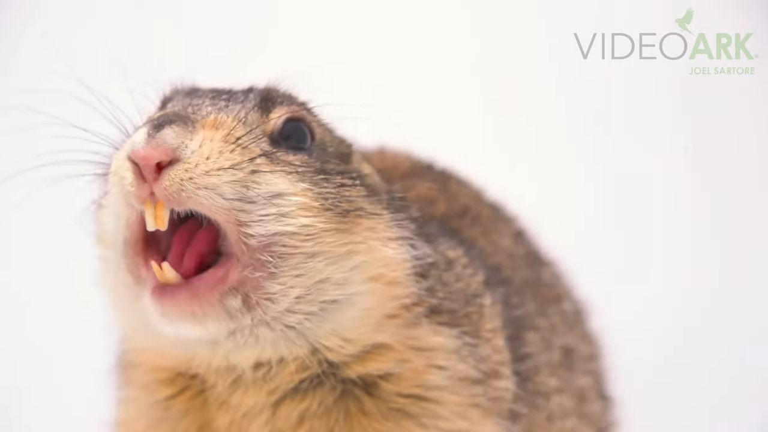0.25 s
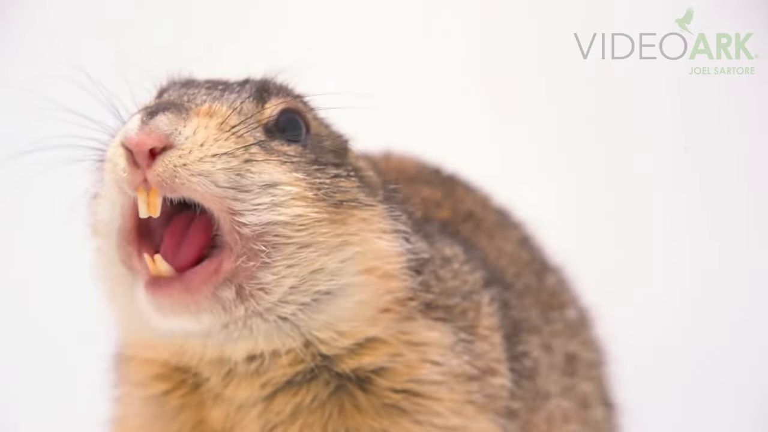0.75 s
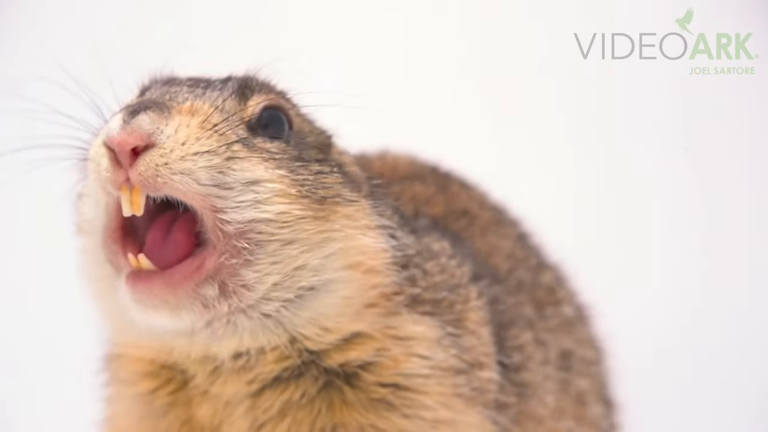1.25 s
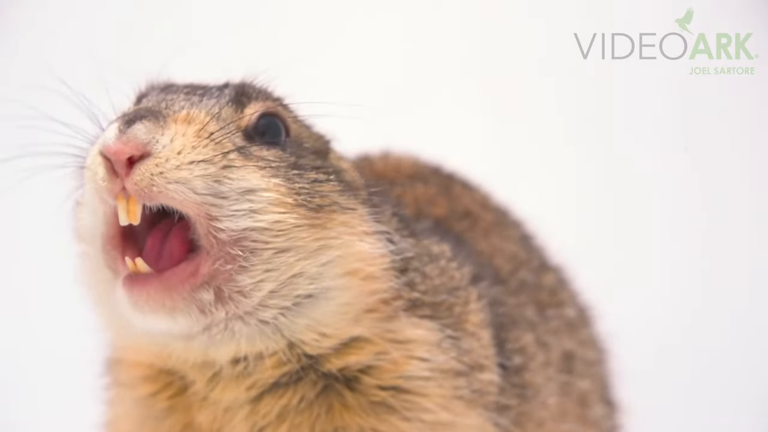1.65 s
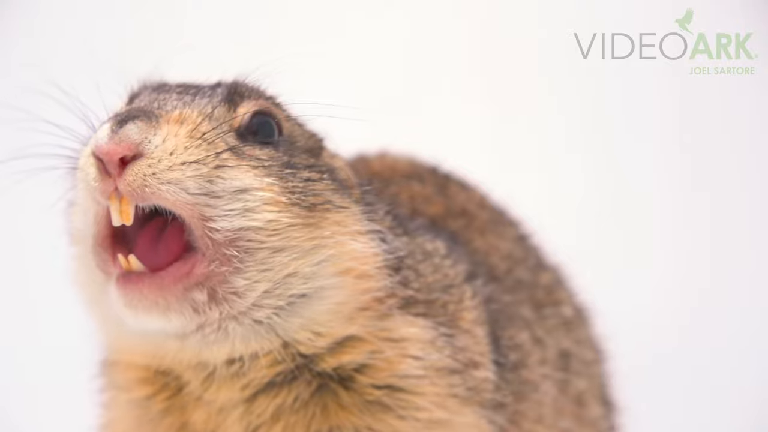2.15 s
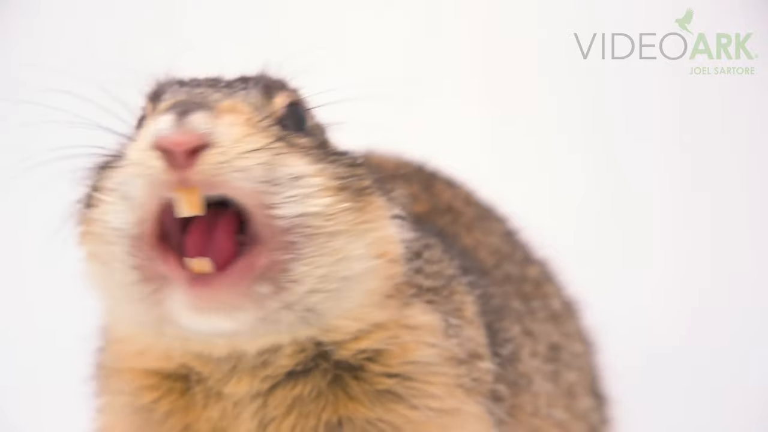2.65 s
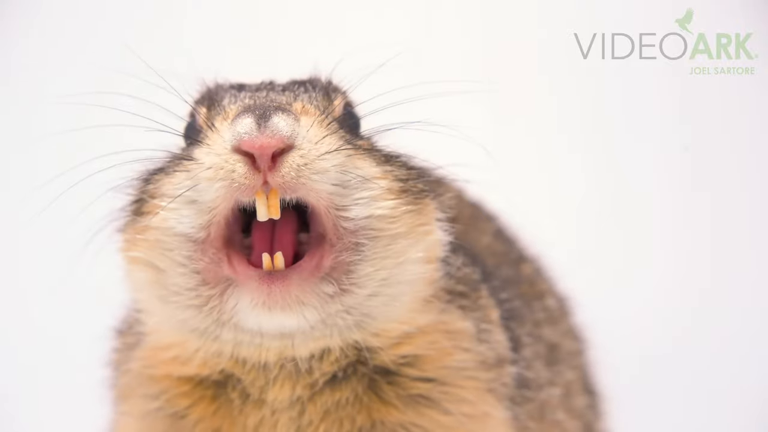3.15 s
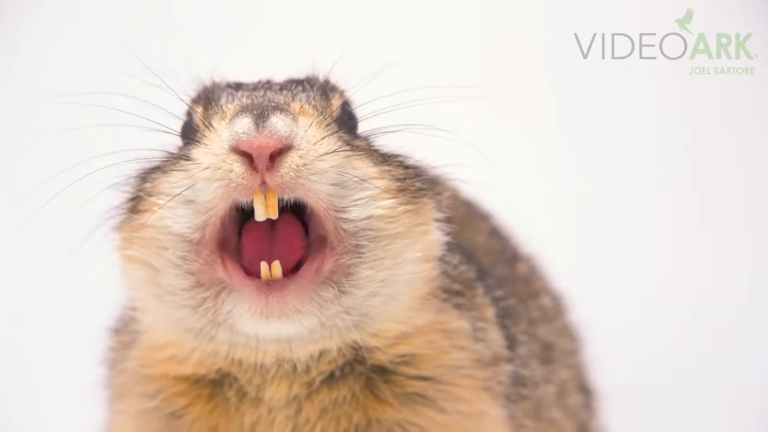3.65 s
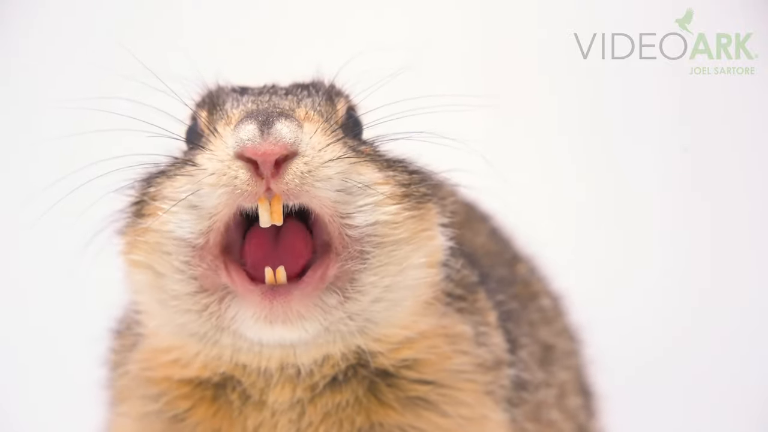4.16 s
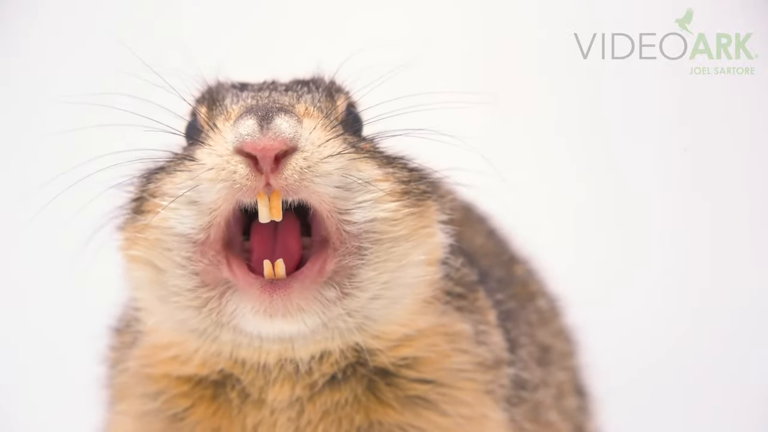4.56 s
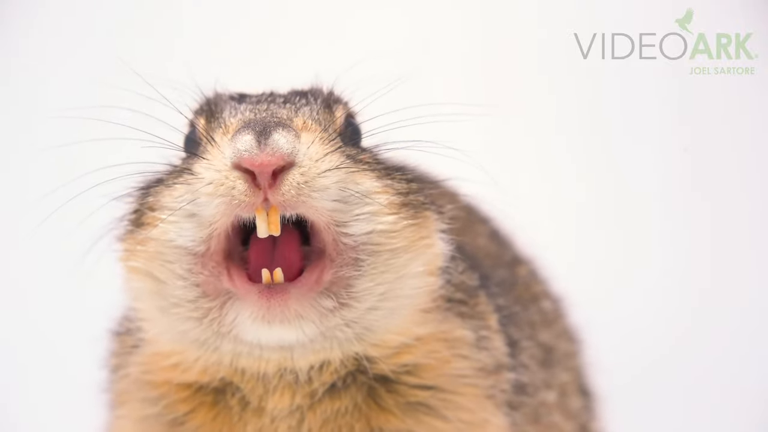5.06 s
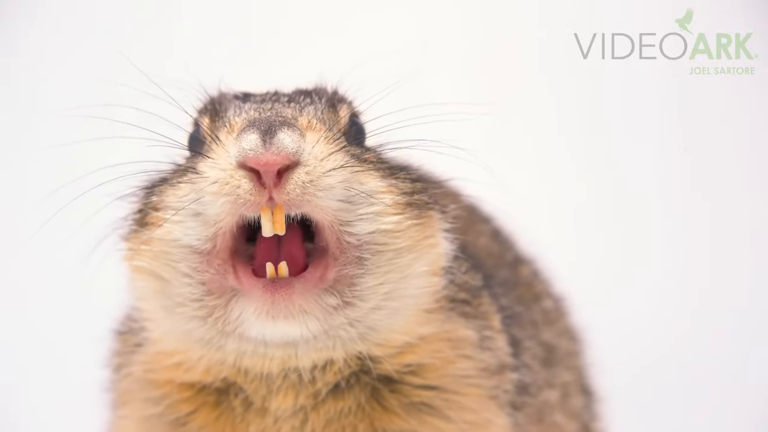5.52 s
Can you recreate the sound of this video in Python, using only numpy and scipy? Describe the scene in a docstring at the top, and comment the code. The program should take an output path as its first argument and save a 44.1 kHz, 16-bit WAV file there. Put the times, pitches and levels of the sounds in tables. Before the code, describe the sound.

A small rodent barks sharply twelve times at a steady pace, close up, with soft rattling inhales between the squeaky yelps.

```python
"""A small, dry studio: a prairie dog barks twelve times, close to a stereo microphone.
Each bark opens with a puff of noise and a few hard creaky pulses, rises into a clear arched squeal and
sags to a rough end: trains of pulses shaped by throat resonances. Between barks it draws air with a soft
rattle of fluttering noise. Its body makes low rumble and bumps, small ticks, scuffs and a short rustle."""
import sys
import numpy as np
from scipy import signal
from scipy.fft import rfft, irfft, next_fast_len
from scipy.io import wavfile
from scipy.ndimage import uniform_filter1d, map_coordinates

SR = 44100
rng = np.random.default_rng(int(sys.argv[2]) if len(sys.argv) > 2 else 0)


def waveform_to_disk(signal):
    """Save audio, clipped to [-1, 1], as 16-bit WAV at the path in sys.argv[1]."""
    frames = np.transpose(np.atleast_2d(signal))
    scaled = np.clip(frames, -1, 1) * 32767
    samples = np.round(scaled).astype(np.int16)
    wavfile.write(sys.argv[1], SR, samples)


N = 255339
TIME = np.arange(N) / SR


def from_db(db):
    """Decibels to gain."""
    return 10 ** (np.asarray(db) / 20)


def ramp(x):
    """Hold between 0 and 1."""
    return np.clip(x, 0, 1)


def rms_one(x):
    """Scale to unit power."""
    return x / np.sqrt(np.mean(x ** 2) + 1e-20)


def add(track, sound, s):
    """Mix a sound into a track from time s on."""
    at = max(round(s * SR), 0)
    track[..., at:at + sound.shape[-1]] += sound[..., :N - at]


def cut(x, hz, kind, order=2):
    """Butterworth low- or high-pass."""
    sections = signal.butter(order, min(hz, .45 * SR), kind, fs=SR, output="sos")
    return signal.sosfilt(sections, x + 1e-18)


def resonate(x, hz, width_hz, db):
    """Lift or notch one band."""
    lift = from_db(db / 2)
    half = np.pi * width_hz / SR
    turn = -2 * np.cos(2 * np.pi * hz / SR)
    zeros = [1 + half * lift, turn, 1 - half * lift]
    poles = [1 + half / lift, turn, 1 - half / lift]
    return signal.lfilter(zeros, poles, x)


def drift(rate, size=N):
    """Smooth random wander, drawn with spread 1, that changes about rate times a second."""
    points = rng.standard_normal(4000)
    return map_coordinates(points, [np.arange(size) * rate / SR], order=3, mode="wrap")


def coloured(x, spectrum):
    """Give a sound the colour of a (Hz, dB) table; nothing passes outside the table."""
    hz, db = np.transpose(spectrum)
    size = next_fast_len(N)
    grid = np.log(np.arange(size // 2 + 1) * SR / size + 1)
    gain_db = np.interp(grid, np.log(hz), db, left=-np.inf, right=-np.inf)
    return irfft(rfft(x, size) * from_db(gain_db), size)[..., :N]


def noise(spectrum, likeness):
    """Stereo noise of a given colour and left-right likeness; rms 1."""
    mid, side = coloured(rng.standard_normal((2, N)), spectrum)
    alike = np.clip(likeness, -1, 1)
    return rms_one(np.sqrt(1 + alike) * mid + np.sqrt(1 - alike) * side * [[1], [-1]])


def swells(rows):
    """Bell-shaped rises and falls of level from (s, dB, half length s) rows."""
    return sum(from_db(db) * np.exp(-np.minimum(((TIME - s) / half) ** 2 / 2, 20))
               for s, db, half in rows)


# The studio with nobody moving, as the microphone hears it.
# Each row: frequency in Hz, relative level per Hz in dB.
FLOOR_COLOUR = [(15, -44), (25, -20), (149, -9), (335, -19), (624, -21.5), (1740, -28), (1940, -28.5),
                (2350, -28), (2690, -30.5), (3430, -29.5), (16000, -46.5)]


def room_floor(floor_db=-56):
    """Steady coloured noise of the quiet room, partly alike in the two channels."""
    return from_db(floor_db) * noise(FLOOR_COLOUR, likeness=0.54)


# Rumble through the support, up to the microphone.
# Each row: frequency in Hz, relative level per Hz in dB.
RUMBLE_COLOUR = [(12, -42), (20, -4), (65, 7.5), (165, 2), (313, -11), (369, -18), (410, -18), (640, -35),
                 (700, -37), (910, -63), (1540, -120)]
# The body shifts its weight, each time a swell of rumble.
# Each row: peak time in seconds, relative level in dB, half length in seconds.
WEIGHT_SHIFTS = [(.03, -60, 0.0057), (.3, -39, .028), (.505, -24, .014), (.705, -25.5, 0.011),
                 (.875, -36, 0.011), (.965, -38, 0.028), (1.17, -48, 0.054), (1.34, -33, 0.019),
                 (1.46, -48, 0.011), (1.785, -30.5, 0.012), (1.85, -26.5, 0.0082), (1.905, -28, .011),
                 (2.06, -41, 0.028), (2.185, -14.5, .016), (2.235, -13.5, 0.014), (2.31, -28.5, 0.011),
                 (2.37, -28, 0.018), (2.78, -38.5, 0.037), (2.93, -57, 0.011), (3.385, -38.5, .016),
                 (5.52, -42.5, 0.0082), (5.58, -50.5, 0.023), (5.745, -40, 0.043)]
# Dull single bumps from the support. Each row: start in seconds, relative level in dB.
DULL_BUMPS = [(0.282, -28.5), (0.5, -19.5), (0.706, -23.5), (1.357, -34), (1.761, -39), (1.847, -33),
              (2.135, -20), (2.175, -5.5), (2.234, -18), (2.371, -23)]
# a steady rumble lies under the shifts until the animal settles
RESTLESS_DB, SETTLES_S, SETTLING_DB_PER_S = -46.5, 2.3, 25


def shifting(bump_db=2.5, bump_hz=175, pan_db=2.0):
    """Lumpy rumble and decaying low bumps come through the support, unlike in the two channels."""
    restless = from_db(RESTLESS_DB - SETTLING_DB_PER_S * np.maximum(TIME - SETTLES_S, 0))
    out = (restless + swells(WEIGHT_SHIFTS)) * noise(RUMBLE_COLOUR, likeness=0.25)
    t = TIME[:SR // 10]
    envelope = np.exp(-t / 0.0075) * (1 - np.exp(-t / 0.00085))
    for s, db in DULL_BUMPS:
        # each channel has its own pitch and phase
        hz = bump_hz * np.exp(0.16 * rng.standard_normal((2, 1)))
        wave = np.sin(2 * np.pi * (hz * t + rng.random((2, 1))))
        add(out, from_db(db + bump_db) * wave * envelope, s)
    # the soft support passes no click
    out = cut(out, 650, "low")
    return cut(out, 35, "high", order=1) * from_db([[pan_db], [-pan_db]])


# Small dry ticks near the microphone. Each row: start in seconds, relative level in dB,
# strength of the ring in dB, treble edge in Hz.
DRY_TICKS = [(0.8582, -30, 3, 13900), (1.672, -36.5, 7, 8000), (2.268, -28, 12, 6000),
             (2.318, -25.5, 20, 7000), (2.617, -33, 10, 7000), (2.6694, -29.5, 11, 8000),
             (2.774, -33, 1, 7050), (2.8308, -32, 5, 7000)]
# Short scuffs. Each row: peak time in seconds, level in dB, half length in seconds.
SHORT_SCUFFS = [(2.921, -36, 0.0018), (2.931, -40.5, 0.005), (5.745, -44.5, 0.0047), (5.786, -45.5, 0.0029)]
# The colour of a scuff. Each row: frequency in Hz, relative level per Hz in dB.
SCUFF_COLOUR = [(880, -58), (1500, -20), (2600, -34), (3500, -4), (4330, -9), (4770, -6), (6300, -15.5),
                (15000, -36.5)]


def ticks_and_scuffs(tick_db=-2, tick_decay_s=0.00082, ring_hz=2800, ring_width_hz=450):
    """Tiny bright contacts, noise snaps with one short ring, and brief brushing swells of noise."""
    ticks, t = np.zeros(N), TIME[:SR // 50]
    for s, db, ring_db, edge_hz in DRY_TICKS:
        snap = from_db(db + tick_db) * np.exp(-t / tick_decay_s) * rng.standard_normal(len(t))
        snap = cut(cut(snap, 630, "high", order=1), edge_hz, "low")
        add(ticks, resonate(snap, ring_hz, ring_width_hz, ring_db), s)
    return ticks + swells(SHORT_SCUFFS) * noise(SCUFF_COLOUR, likeness=0.76)


def rustle(start_s=2.2, end_s=2.88, grains_per_s=600, rustle_db=-58):
    """Fur and claws brush the support as the animal turns its head: a shower of tiny random grains."""
    born = rng.random(N) < grains_per_s / SR
    grains = cut(born * rng.standard_normal(N), 1020, "high", order=1)
    grains = rms_one(cut(grains, 8000, "low"))
    turning = ramp(np.minimum(TIME - start_s, end_s - TIME) / 0.052)
    return from_db(rustle_db) * turning * grains


# The animal draws air, close to the microphone. Each row: start in seconds, end in seconds,
# throat rattle in dB and hiss in dB as reached towards the end, snore from 0 to 1, mean flutter in Hz.
DRAWN_BREATHS = [(-.1, 0.046, -45.5, -41.5, .37, 111.6), (0.2, 0.561, -46.5, -44, 0.72, 113.2),
                 (.76, 1.011, -46, -45.5, 0.85, 122.9), (1.198, 1.454, -54.5, -50.5, 0.63, 115.1),
                 (1.617, 1.91, -52.5, -53, .2, 116.7), (2.136, 2.368, -46.5, -46, .12, 115),
                 (2.518, 2.91, -52.5, -53, 0.34, 114.4), (3.15, 3.385, -60, -60, 0.04, 116.5),
                 (3.57, 3.847, -53, -49, 0.57, 115.5), (4.023, 4.311, -48, -47.5, 0.48, 115.1),
                 (4.517, 4.793, -49.5, -48, 0.74, 115.4), (4.972, 5.267, -61, -56.5, 0.4, 114.6),
                 (5.417, 5.71, -62, -84.5, 0.2, 116.2)]
# The throat under drawn air. Each row: frequency in Hz, relative level per Hz in dB.
RATTLE_COLOUR = [(90, -7.5), (160, -1.5), (230, 7), (330, -6), (450, 0), (600, -1.5), (830, -5), (1200, -2),
                 (1400, -13), (2200, -15), (3500, -43), (5000, -54.5)]
# Air hissing at the teeth. Each row: frequency in Hz, relative level per Hz in dB.
HISS_COLOUR = [(1470, -30.5), (2500, -2.5), (3310, -9), (3830, 4), (4340, -6), (5070, 2), (7300, -10.5),
               (7950, -12), (9360, -15), (16000, -23.5)]
# every inhale opens, swells steadily and closes
INHALE_ATTACK_S, INHALE_RELEASE_S = 0.042, 0.022
RATTLE_SWELL_DB_PER_S, HISS_SWELL_DB_PER_S = 14, 60.5


def inhales(flutter_depth=0.79, flutter_wander=.018, tap_spread_db=2):
    """Soft tissue flutters in the drawn air: it taps the throat and chops the hiss."""
    rattle, hiss, flutter, flutter_hz = np.zeros((4, N))
    for start, end, rattle_db, hiss_db, snore, hz in DRAWN_BREATHS:
        to_go = np.maximum(end - TIME, 0)
        opening = ramp((TIME - start) / INHALE_ATTACK_S) * ramp(to_go / INHALE_RELEASE_S)
        rattle += opening * from_db(rattle_db - RATTLE_SWELL_DB_PER_S * to_go)
        hiss += opening * from_db(hiss_db - HISS_SWELL_DB_PER_S * to_go)
        flutter[TIME > start] = ramp(snore)
        flutter_hz[TIME > start] = hz
    cycles = np.cumsum(flutter_hz * (1 + flutter_wander * drift(25))) / SR
    # one tap per flutter cycle, of uneven strength
    clicks = np.diff(np.floor(cycles), prepend=0) * from_db(tap_spread_db * drift(150))
    taps = rms_one(coloured(clicks, RATTLE_COLOUR))
    breath = noise(RATTLE_COLOUR, likeness=0.89)
    in_throat = flutter * taps + np.sqrt(1 - flutter ** 2) * breath
    chop = np.exp(flutter_depth * flutter * np.cos(2 * np.pi * cycles))
    chop /= np.sqrt(uniform_filter1d(chop ** 2, size=1200))
    return rattle * in_throat + hiss * chop * noise(HISS_COLOUR, likeness=0.06)


# The puff that opens a bark. Each row: frequency in Hz, relative level per Hz in dB.
PUFF_COLOUR = [(60, -18.5), (140, -25.5), (230, -5.5), (380, -12.5), (600, -8), (1000, -14), (1700, -20),
               (4000, -19.5), (7000, -23), (15000, -39.5)]
# the opening puff swells up to the start of the bark, holds and dies
PUFF_DB, PUFF_RISE_DB_PER_S, PUFF_HOLD_S, PUFF_FALL_DB_PER_S = -20, 1756.5, 0.0037, 1991


def puffs():
    """Air bursts out just before the folds catch: one short swell of noise per bark."""
    swell = np.zeros(N)
    for s, *_ in BARK_ROWS:
        before = np.maximum(s - TIME, 0)
        after = np.maximum(TIME - s - PUFF_HOLD_S, 0)
        level_db = PUFF_DB - PUFF_RISE_DB_PER_S * before - PUFF_FALL_DB_PER_S * after
        swell += from_db(np.maximum(level_db, -200))
    return swell * noise(PUFF_COLOUR, likeness=0.99)


# The pitch arch: pitch at the start, at the end and at its lowest, as shares of the top.
START_PITCH, END_PITCH, SLACK_PITCH = .58, .63, 0.33
RISE_POWER, SAG_POWER = 2.05, 3.7  # curvature of each side
# the folds are creaky and rough until they lock, and again once they break up (shares of the length)
LOCK_AT, LOCK_TAKES, BREAK_AT, BREAK_TAKES = .2, 0.044, 0.88, 0.057
# Weakening of every second pulse, from 0 to 1: at the onset, while locked, in the tail.
CREAK_STAGES = (0.96, 0.027, 0.12)
# Roughness, from 0 to 1: at the onset, while locked, in the tail.
ROUGH_STAGES = (0.29, 0.022, 0.42)


def gesture(share, top_at):
    """Pitch, creak and roughness along a bark: the folds tighten and lock, then sag and break up."""
    rise = ramp(1 - share / top_at) ** RISE_POWER
    sag = np.maximum((share - top_at) / (1 - top_at), 0) ** SAG_POWER
    pitch = np.maximum(1 - (1 - START_PITCH) * rise - (1 - END_PITCH) * sag, SLACK_PITCH)
    onset = ramp((LOCK_AT - share) / LOCK_TAKES)
    tail = ramp((share - BREAK_AT) / BREAK_TAKES)
    stages = np.array([onset, 1 - onset - tail, tail])
    return pitch, np.dot(CREAK_STAGES, stages), np.dot(ROUGH_STAGES, stages)


# Peaks and notches of throat and mouth, scaled in frequency for each bark.
# Each row: unscaled frequency in Hz, width in Hz, lift in dB.
THROAT_BANDS = [(1380, 2100, -0.5), (2157, 330, 4), (2760, 180, 2.5), (3726, 1400, 9.5), (4196, 150, -8.5),
                (5670, 1700, 13.5), (6450, 1450, -13), (8030, 130, 3.5), (9100, 870, -9),
                (11560, 430, -6.5), (13900, 1330, -6.5)]


def throat(source, scale, bright_db, low_hz=2800, high_hz=5200):
    """A small open mouth radiates little bass; its shape differs a little from bark to bark."""
    out = cut(cut(source, low_hz, "high"), high_hz, "low")
    for hz, width_hz, db in THROAT_BANDS:
        out = resonate(out, hz * scale, width_hz, db)
    return resonate(out, 13000, 7000, bright_db)


# The locked squeal is led by its first and fourth harmonics.
# Each entry: lift in dB for harmonic 1, 2, ..
SQUEAL_HARMONICS = [5.5, -9.5, -6.5, 4, -2, 0.5, 0.5, -5.5, 2.5, -5.5, 2]
# the soft fundamental: relative level, fade over the bark's length, release after it
HUM_DB, HUM_FADE_DB, HUM_RELEASE_DB_PER_S = -40, 10, 898


def bark(top_hz, length, top_at, attack_db, squeal_db, hold_db, tail_db, mouth_scale, bright_db,
         jitter=0.029, air=1.0, shimmer_db=7, slack_hz=7000, first_db=-1.0, release_db=-24):
    """The folds snap open on every second cycle at first, then lock into a clear tone and break up."""
    size = SR // 6
    t = np.arange(size) / SR
    share = t / length
    pitch, creak, rough = gesture(share, top_at)
    hz = top_hz * uniform_filter1d(pitch, size=200) * (1 + jitter * rough * drift(530, size))
    cycles = np.cumsum(hz) / SR - .25
    # one band-limited pulse per cycle; while the folds are locked a few harmonics take the lead
    k = np.arange(1, 31)[:, None]
    harmonics = np.cos(2 * np.pi * k * cycles) * (k * hz < SR / 2.4)
    locked = np.interp(share, [.15, .28, .86, .97], [0, 1, 1, 0])
    harmonics[:len(SQUEAL_HARMONICS)] *= from_db(np.outer(SQUEAL_HARMONICS, locked))
    pulses = harmonics.sum(axis=0)
    weak = np.round(cycles) % 2 * np.clip(creak, 0, 1)
    # the source starts slightly held back; roughness makes its level flicker
    flicker_db = first_db * np.exp(-t / 0.0044) + shimmer_db * rough * drift(640, size)
    source = pulses * (1 - weak) * from_db(flicker_db)
    # breath noise pulses with the folds
    gusts = rng.standard_normal(size) * (2 + np.cos(2 * np.pi * cycles))
    source += air * pulses.std() * rough * gusts
    # the pulses soften as the pressure falls
    pressure = np.interp(share, [.25, .6], [1, 0])
    softened = cut(source, slack_hz, "low", order=1)
    voice = throat(pressure * source + (1 - pressure) * softened, mouth_scale, bright_db)
    # even out the level, then impose the bark's own contour
    voice /= np.sqrt(uniform_filter1d(voice ** 2, size=800) + 1e-9)
    level_db = np.interp(share, [.04, .27, .5, .65, .75, .96, 1.12, 1.4],
                         [attack_db, squeal_db, hold_db, hold_db - 3.0,
                          tail_db, tail_db - 2.5, tail_db + release_db, -100])
    hum_db = HUM_DB - HUM_FADE_DB * share - HUM_RELEASE_DB_PER_S * np.maximum(t - length, 0)
    return voice * from_db(level_db) + from_db(hum_db) * np.sin(2 * np.pi * cycles)


# The barks, close to the microphone. Each row: start in seconds, top pitch in Hz, length in seconds,
# top of the arch as a share of the length, then attack, squeal, hold and tail as relative levels in dB,
# mouth resonance scale as a factor, brightness in dB.
BARK_ROWS = [(0.061, 902, 0.11, 0.38, -17.5, -17.5, -22, -31, 1.011, 0),
             (0.583, 914.4, 0.11, 0.37, -14.5, -18, -19.5, -28, 0.97, 0),
             (1.0351, 898, 0.1, 0.37, -15.5, -18, -20, -28.5, 0.96, 2.5),
             (1.4743, 878, 0.11, 0.42, -17.5, -19, -23.5, -29, 0.95, 3.5),
             (1.928, 887.4, 0.11, 0.37, -18.5, -19, -24.5, -28.5, 0.98, 5.5),
             (2.385, 893, 0.11, 0.39, -19, -18, -22, -30.5, 0.976, 4.5),
             (2.9409, 887.6, 0.11, 0.45, -15, -19, -19.5, -29.5, 0.966, 3),
             (3.3987, 903.6, 0.11, 0.41, -19.5, -12.5, -16.5, -27, 0.97, 1.5),
             (3.8648, 877.3, 0.11, 0.3, -13.5, -18.5, -22, -28.5, 0.98, 2.5),
             (4.3331, 888, 0.11, 0.37, -17.5, -15.5, -21.5, -26.5, 0.98, 1),
             (4.8176, 857.6, 0.11, 0.33, -16, -19, -24, -29.5, 0.99, 4.5),
             (5.283, 881.3, .108, 0.39, -17.5, -18.5, -24, -28, 1, 4)]


def barking(effort_db=7.5):
    """All barks from one throat, raised together by the effort."""
    out = np.zeros(N)
    for s, *shape in BARK_ROWS:
        add(out, bark(*shape), s)
    return from_db(effort_db) * out


def delayed(x, ms):
    """The sound a little later, read between samples."""
    return np.interp(TIME - ms / 1000, TIME, x)


# Near surfaces heard in the left channel. Each row: delay in milliseconds, gain as a signed factor.
LEFT_SURFACES = [(0.862, -0.027), (1.68, 0.3), (2.298, 0.09), (5.35, 0.027)]
# Near surfaces heard in the right channel. Each row: delay in milliseconds, gain as a signed factor.
RIGHT_SURFACES = [(1.102, -0.47), (2.07, -0.27), (2.298, 0.1), (3.42, 0.37)]
ROOM_T60_S, ROOM_DB = 0.089, -12.5


def studio(x, right_dull_hz=9000, pan_db=0.36):
    """Direct sound, a little duller on the right, echoes off near surfaces and a short diffuse tail."""
    left = x + sum(gain * delayed(x, ms) for ms, gain in LEFT_SURFACES)
    right = x + sum(gain * delayed(x, ms) for ms, gain in RIGHT_SURFACES)
    right = cut(right, right_dull_hz, "low", order=1)
    near = np.array([left, right]) * from_db([[-pan_db], [pan_db]])
    t = TIME[:SR // 4]
    decay = from_db(-60 * t / ROOM_T60_S) * (1 - np.exp(-t / 0.0027))
    tail = rng.standard_normal((2, len(t))) * decay
    tail /= np.sqrt(np.sum(tail ** 2, axis=1, keepdims=True))
    return near + from_db(ROOM_DB) * signal.fftconvolve(x[None], tail)[:, :N]


def scene():
    """The quiet room, the body and breath of the animal, and its barks."""
    body = shifting() + ticks_and_scuffs()
    breath = inhales() + puffs()
    return room_floor() + body + breath + studio(rustle() + barking())


def gain_control(x, threshold_db=-27, squeeze=0.46, release_db_per_s=38):
    """Loud sound turns the gain down at once; it creeps back, so the room sinks after each bark."""
    power = uniform_filter1d(np.mean(x ** 2, axis=0), size=260)
    over = np.maximum(10 * np.log10(np.abs(power) + 1e-12) - threshold_db, 0) * squeeze
    recovery = release_db_per_s * TIME
    held = np.maximum.accumulate(over + recovery) - recovery
    return x * from_db(-uniform_filter1d(held, size=90))


def record(dry, cutoff_hz=16300):
    """Gain control, a hard clip at full scale, then a steep cut of the top."""
    loud = np.clip(gain_control(dry), -1, 1)
    return signal.sosfilt(signal.ellip(10, .1, 90, cutoff_hz, fs=SR, output="sos"), loud)


dry = scene()
out = record(dry)
waveform_to_disk(out)
```